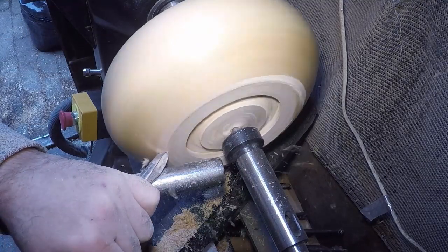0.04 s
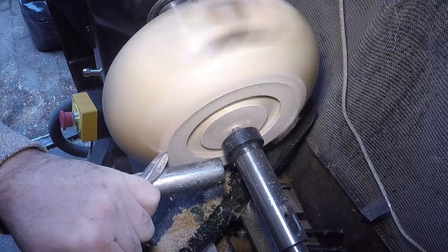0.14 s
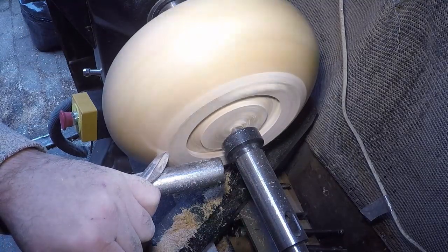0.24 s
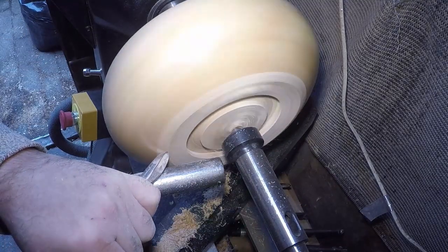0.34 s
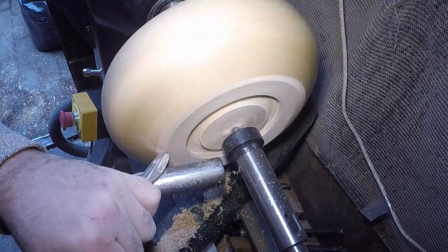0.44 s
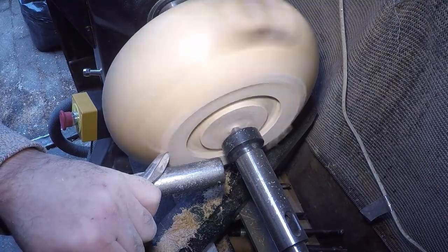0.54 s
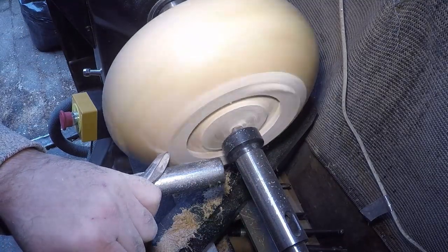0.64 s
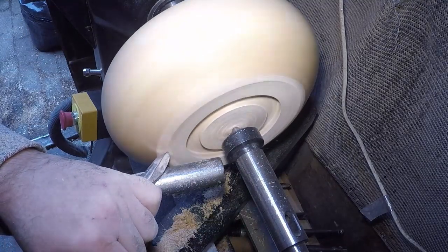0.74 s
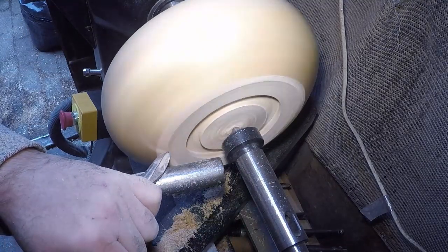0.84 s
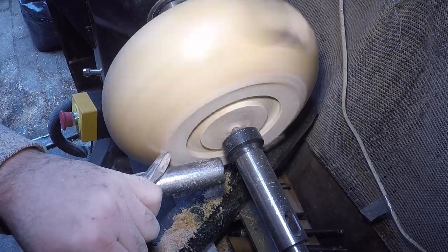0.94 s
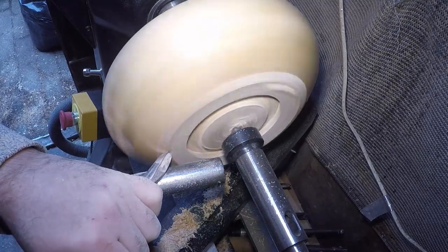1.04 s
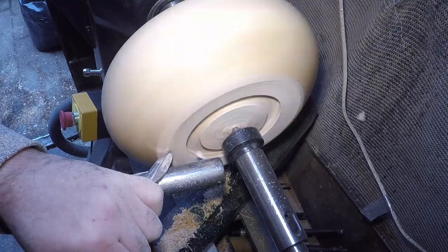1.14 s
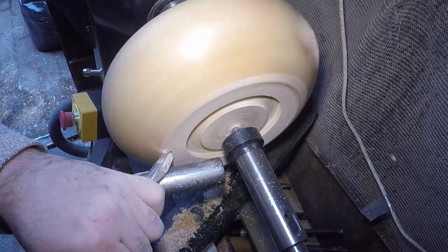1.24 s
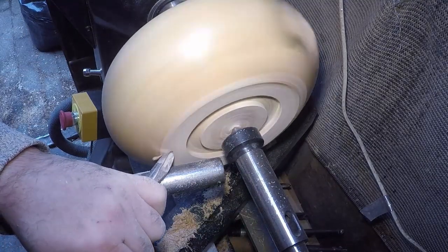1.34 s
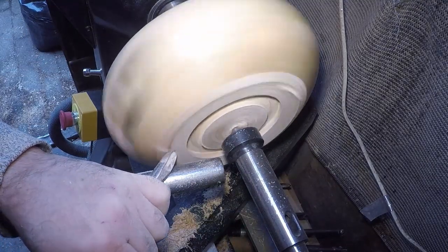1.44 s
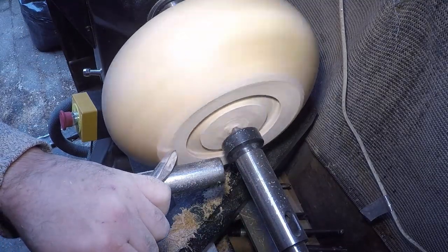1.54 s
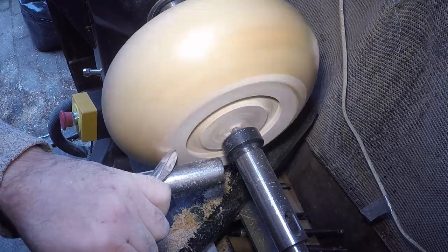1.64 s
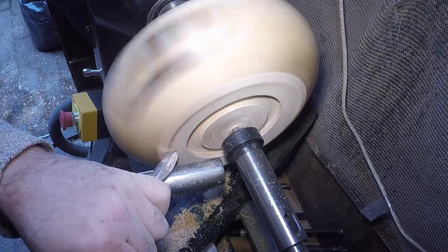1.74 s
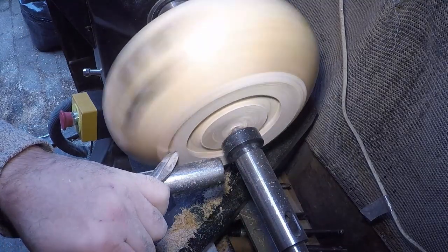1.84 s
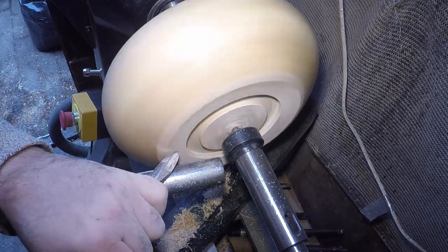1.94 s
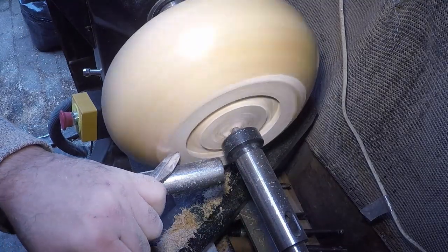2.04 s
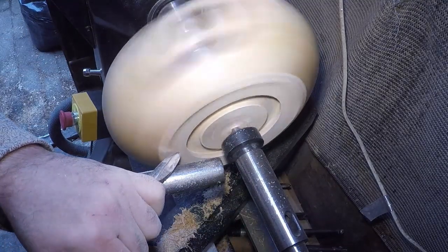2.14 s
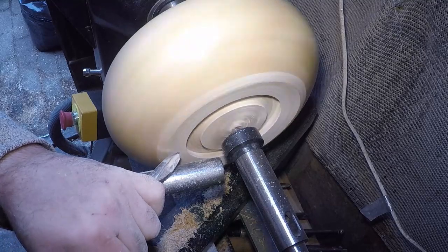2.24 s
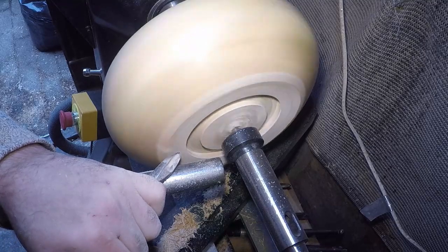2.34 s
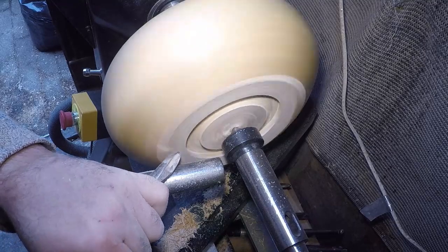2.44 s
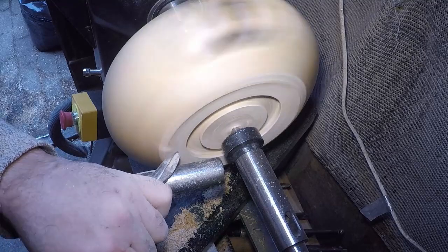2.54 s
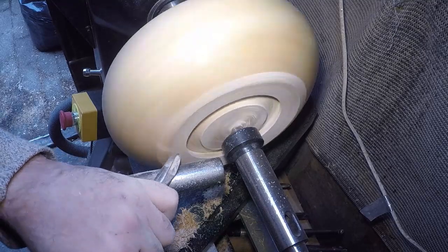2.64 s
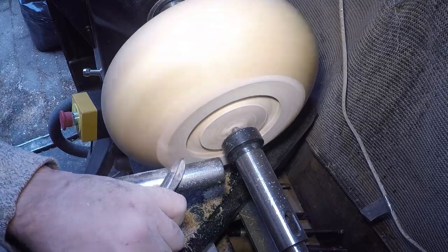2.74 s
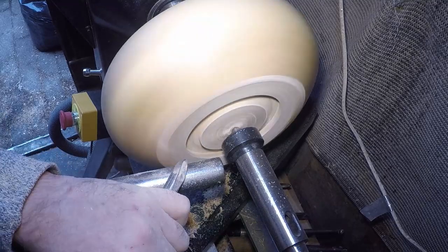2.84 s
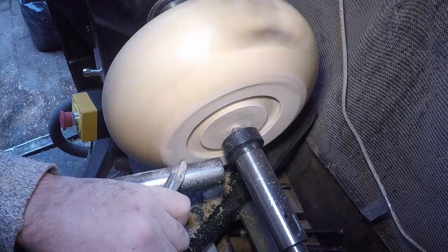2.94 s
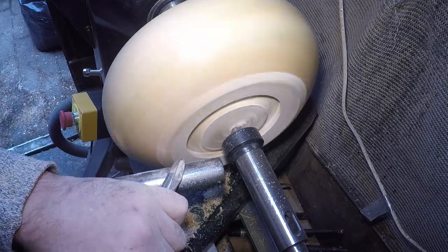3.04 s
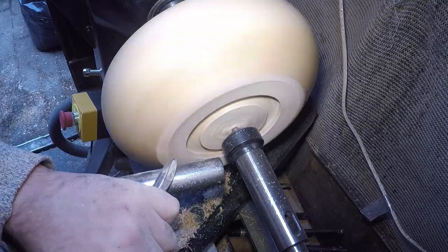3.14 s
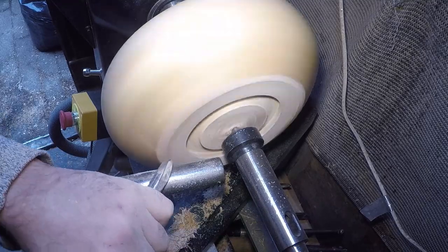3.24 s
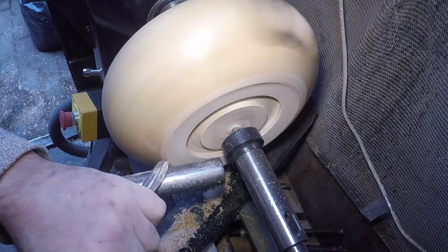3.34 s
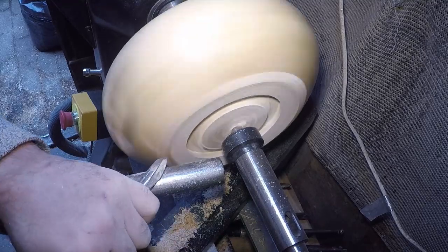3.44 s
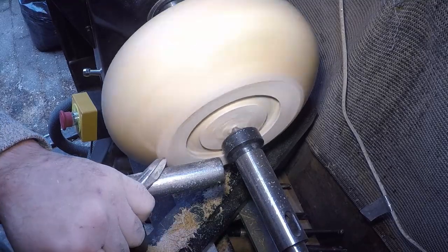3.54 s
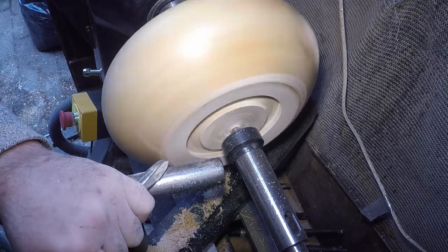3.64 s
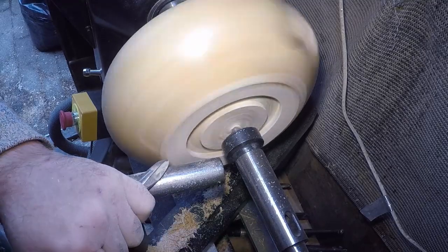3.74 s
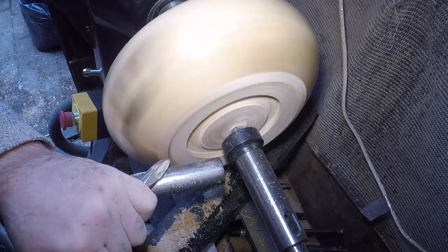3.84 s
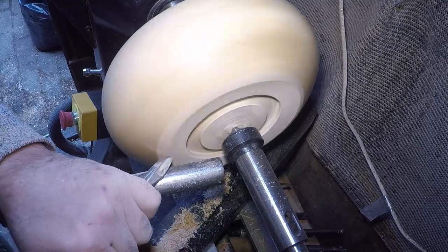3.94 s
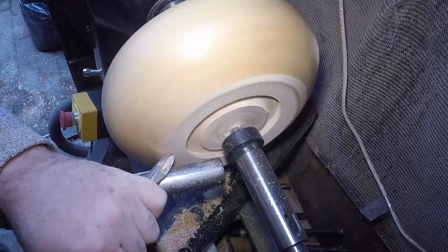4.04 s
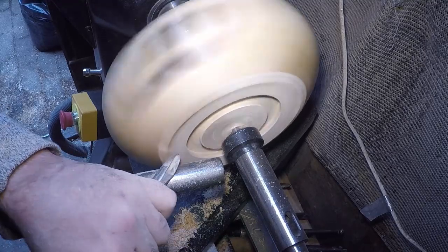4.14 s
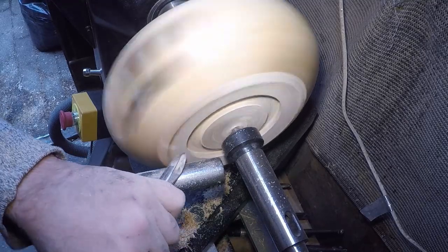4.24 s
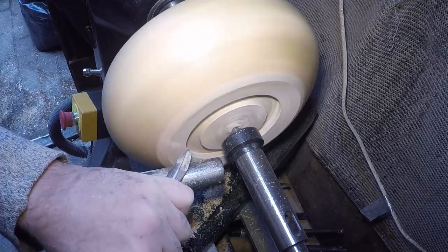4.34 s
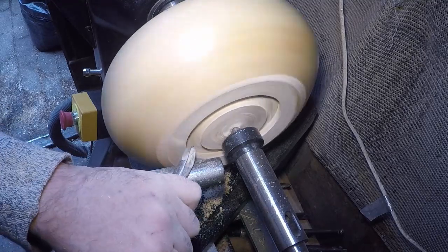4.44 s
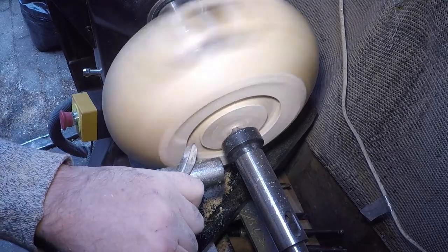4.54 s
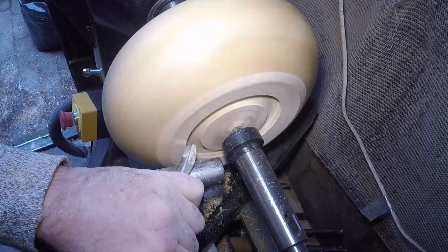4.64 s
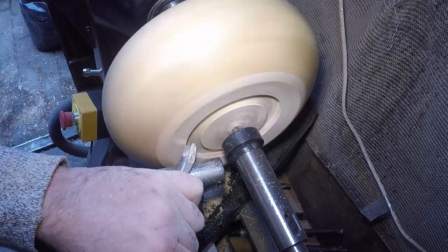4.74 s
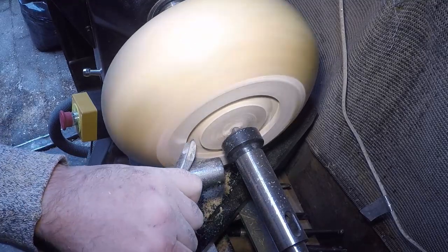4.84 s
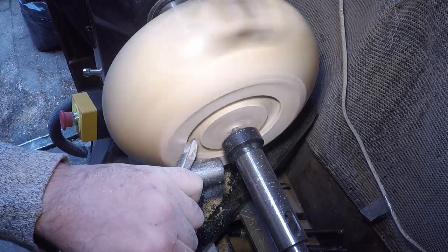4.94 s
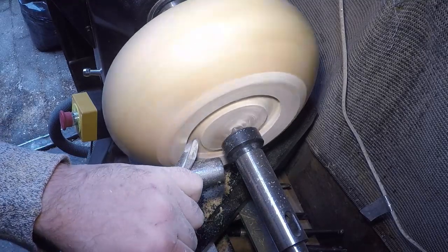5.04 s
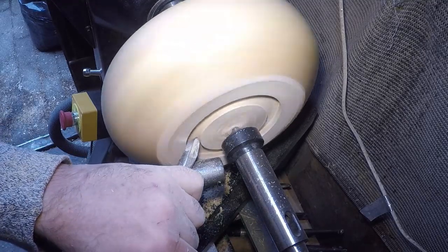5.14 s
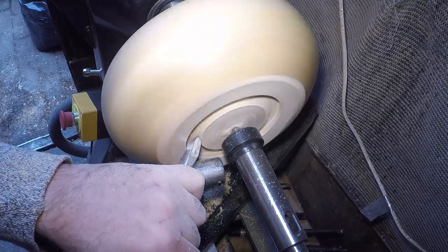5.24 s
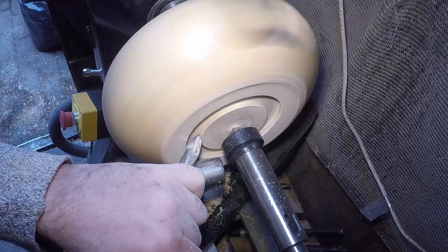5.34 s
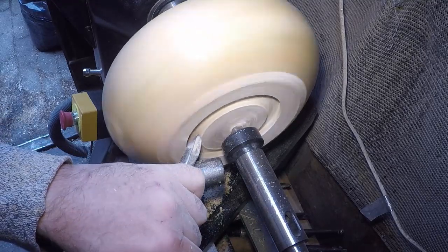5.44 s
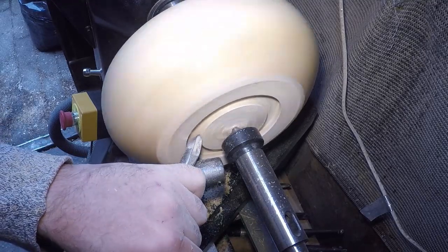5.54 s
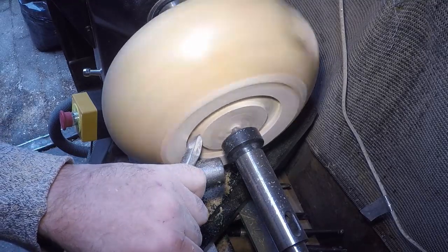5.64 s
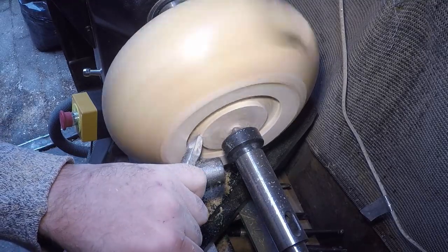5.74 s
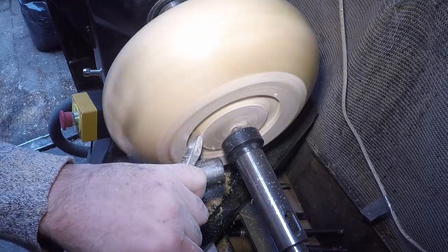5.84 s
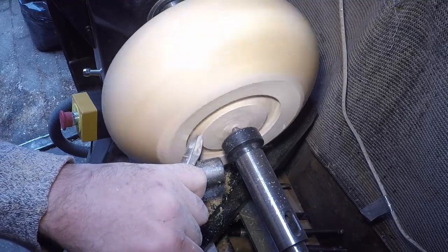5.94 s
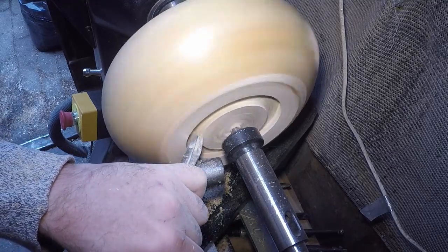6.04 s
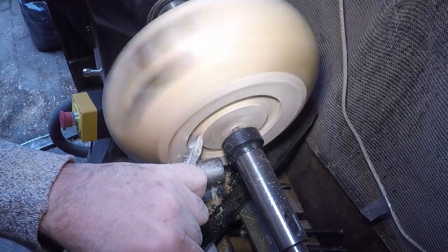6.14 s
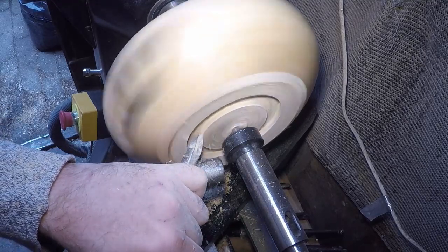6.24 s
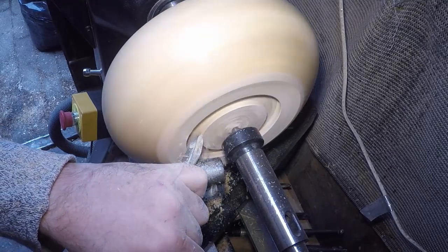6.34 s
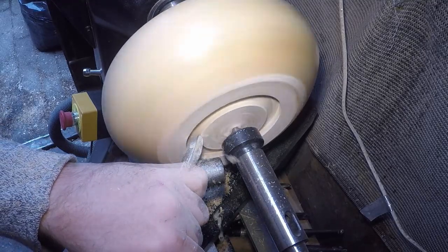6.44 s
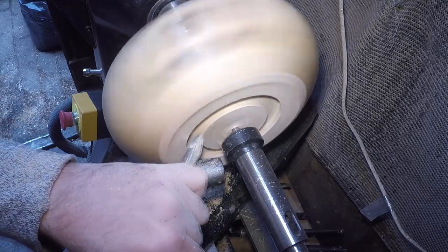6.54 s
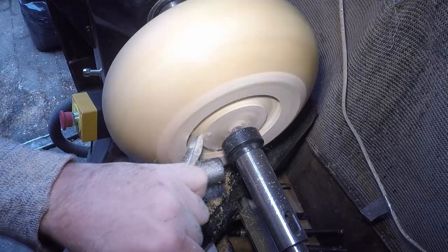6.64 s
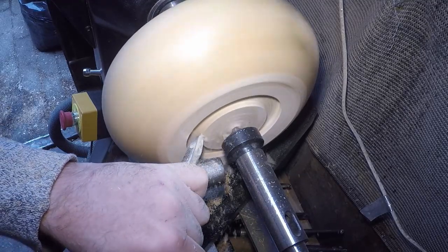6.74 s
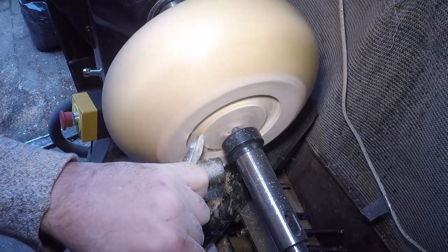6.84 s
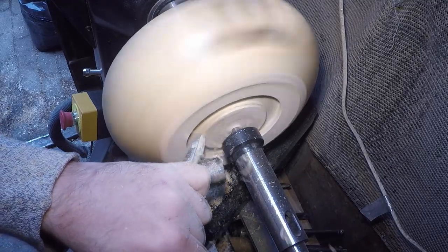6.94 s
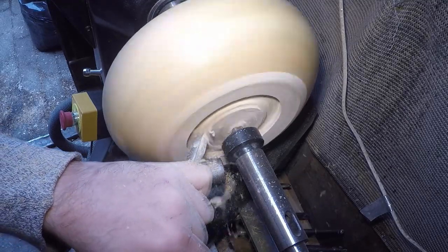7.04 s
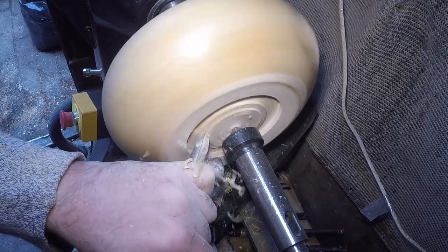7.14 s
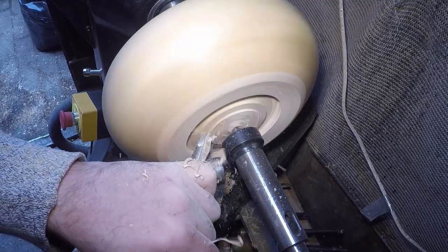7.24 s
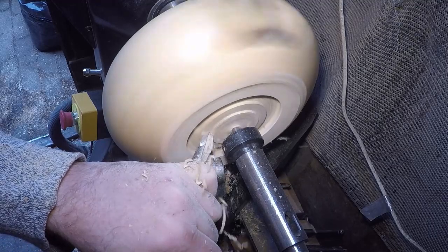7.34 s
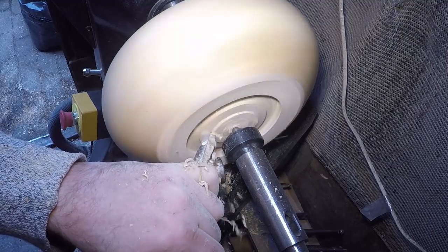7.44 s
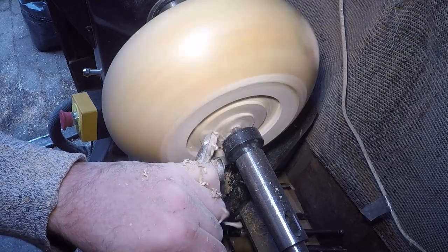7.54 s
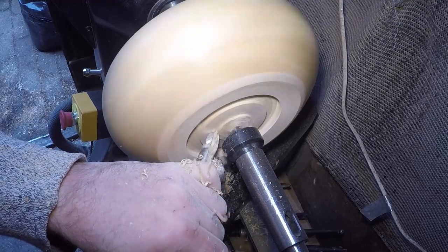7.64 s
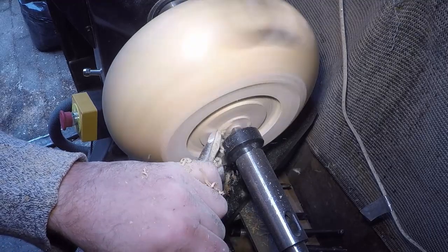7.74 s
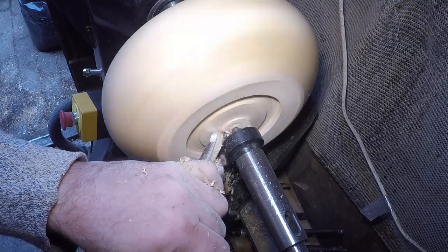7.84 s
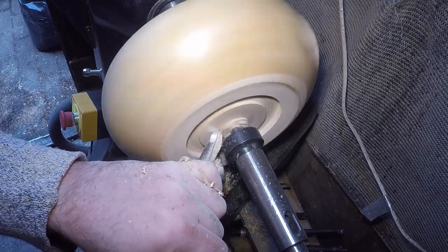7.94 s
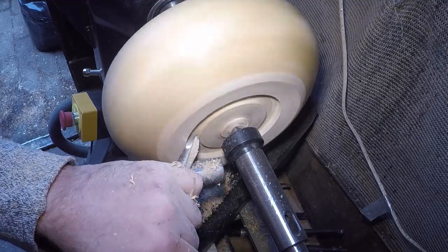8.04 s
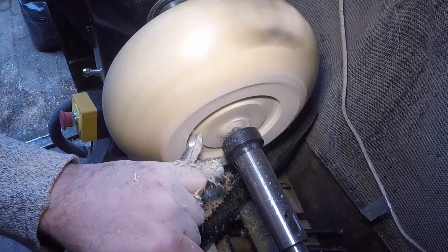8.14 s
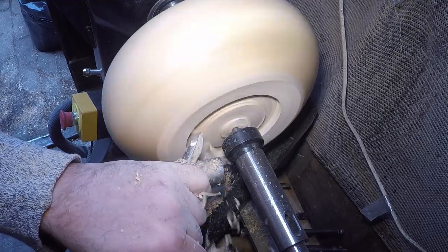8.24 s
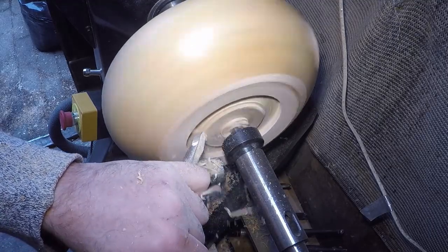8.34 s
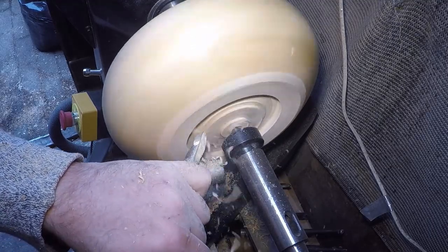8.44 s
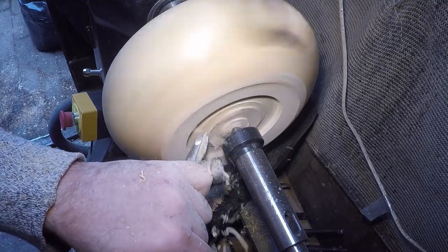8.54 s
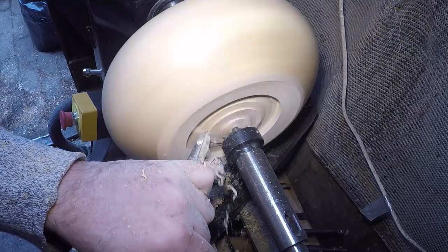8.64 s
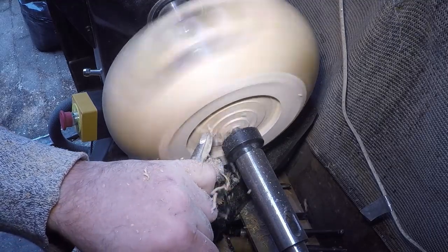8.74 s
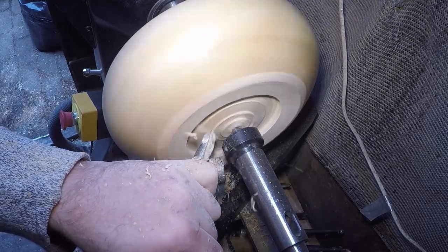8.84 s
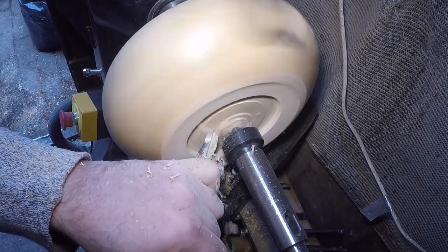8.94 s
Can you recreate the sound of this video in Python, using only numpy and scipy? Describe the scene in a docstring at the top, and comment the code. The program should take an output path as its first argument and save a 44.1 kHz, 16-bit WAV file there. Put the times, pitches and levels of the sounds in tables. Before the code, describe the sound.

Close up, a lathe hums as a gouge lightly scrapes a wooden bowl, lifts off with knocks, then digs in with a high squeal.

```python
"""A wooden bowl spins on a lathe in a workshop, a stereo microphone close by; a gouge cuts its foot.
First a light cut throbs as the same grain passes the edge every turn, ending at 1.4 s in touches and
knocks. Then the drive hums and hisses, with a dull bump and a few grazes. At 5.8 s a heavier cut starts,
its throb fading as the blank becomes round. Near 7 s the edge digs in and tears fresh wood: shavings
spit, the bowl drums and the tool squeals, in two strokes with a short break at 8 s."""
import sys
import numpy as np
from scipy import signal
from scipy.fft import rfft, irfft, next_fast_len
from scipy.io import wavfile
from scipy.ndimage import uniform_filter1d, map_coordinates

SR = 44100
rng = np.random.default_rng(int(sys.argv[2]) if len(sys.argv) > 2 else 0)


def dump(signal):
    """Clip the signal to [-1, 1] and save it as 16-bit WAV at the path in sys.argv[1]."""
    limited = np.clip(np.atleast_2d(signal).T, -1, 1)
    pcm = np.round(limited * 32767).astype(np.int16)
    wavfile.write(sys.argv[1], SR, pcm)


N = 396018
TURN = 3527  # samples in one turn of the spindle
TIME = np.arange(N) / SR

# The microphone's two ports. Each row: frequency in Hz, likeness from 0 to 1, left lead in radians,
# left over right in dB.
MIC_PORTS = [(60, .6, 0, -3), (170, .65, 0, -2), (345, .88, 0, 0), (520, .75, .2, 0), (860, .4, -.5, 0),
             (1200, .25, 0, 0), (1720, .9, 1.25, 1), (2240, .15, 1.5, 4), (2900, .75, -.6, -2),
             (3700, .92, 0, 0), (4500, .8, 0, 1), (5200, .62, .1, -1), (6200, .5, 0, 1.5),
             (7200, .25, 0, 0), (8600, .2, -2.6, -2.5), (10300, .2, -2.8, -1), (12000, .6, 0, 0)]

# Drive tones. Each row: level in dB, throb in dB, loudest point in seconds into the turn, left lead in
# radians, phase wander in radians.
DRIVE_TONES = [(-63, 1.5, 0.00041, 1, 0.13), (-53.5, -3, 0.023, -1.73, .1),
               (-51.5, 12.5, 0.043, 0.69, 0.18), (-56, 3.5, 0.079, 1, 0.17), (-57, 15, 0.1, 1, 0.21),
               (-52, 13, 0.075, 1, 0.32), (-58.5, 6, 0.007, 1, 4.2), (-53, 16, 0.06, 1, 0.92),
               (-67, 2, 0.09, 1, 1.6), (-61, 1, 0.057, 0, 2.8), (-58, 4, 0.076, 0, 4.9),
               (-63.5, -3, 0.11, 1, .5), (-58.5, 4.5, 0.087, 1, 0.44)]
TONE_ORDERS = [12, 23, 25, 36, 48, 72, 89.5, 114, 120, 331, 347, 143, 145]  # cycles a turn, one for each drive tone

# Levels over time. Each row: time in seconds, level in dB.
WHINE_LEVEL = [(0, -39.5), (1.2, -45), (1.6, -38), (2.3, -45.5), (3.3, -37), (3.9, -45.5), (4.5, -38.5),
               (6.3, -40.5), (7.1, -48), (8.98, -44)]  # strongest drive tone
LIGHT_LEVEL = [(0, -33), (.3, -32), (.6, -30.5), (1.3, -32), (1.35, -35), (1.4, -37), (1.44, -50),
               (1.46, -63)]
HEAVY_STROKES = [
    [(5.803, -25.5), (5.88, -34.5), (6.03, -27.5), (6.45, -24), (6.92, -26.5), (7.02, -27), (7.88, -27),
     (7.94, -36.5), (8, -39), (8.045, -39)],
    [(8.12, -39), (8.155, -28), (8.185, -23.5), (8.3, -26.5), (8.98, -26.5)],
]  # one list a stroke

# Noise colours. Each row: frequency in Hz, relative density in dB.
RUMBLE_COLOUR = [(110, -28), (150, -4), (250, -11), (310, -4), (390, -16), (470, -8), (540, -18.5),
                 (790, -18), (1020, -11), (1260, 1), (1600, -9.5), (3580, -17), (4230, -14.5), (5200, -35),
                 (6760, -58)]
BEARING_COLOUR = [(2940, -66), (5000, -13.5), (5220, -14.5), (6170, -0.5), (7170, -2), (8410, -11),
                  (10600, -29.5), (12800, -38), (15300, -35)]
TOUCH_COLOUR = [(500, -41), (850, -24), (1700, -2), (2300, -2.5), (3500, -1), (5500, -8.5), (7150, -17),
                (12100, -120)]
LIGHT_COLOUR = [(410, -35), (700, -20), (1010, -22), (1270, -23), (1760, -6.5), (1940, -11), (2930, -8),
                (5500, -17.5), (7150, -15.5), (12100, -120)]
HEAVY_COLOUR = [(470, -54), (800, -15), (896, -14), (1590, -6.5), (1790, 6), (2040, -3.5), (2840, 1),
                (5500, -8.5), (7150, -33), (12100, -120)]
SHAVINGS_COLOUR = [(2710, -25), (4600, -8), (4690, -11), (6540, 0.5), (7050, -5), (7800, -4.5), (8500, -11),
                   (10700, -21), (14000, -28.5), (15300, -35)]
SPIT_COLOUR = [(1500, -36), (3000, -14), (5000, -2.5), (7500, 4.5), (10000, -5.5), (13000, -24.5),
               (15300, -26)]

# Resonances. Each row: frequency in Hz, width in Hz, relative gain in dB.
BEARING_MODES = [(5840, 73, 0.5), (6370, 30, 8.5), (7140, 110, 4), (7390, 82, 3)]
CUT_MODES = [(1072, 17, 11.5), (1515, 250, 6.5), (1732, 450, -2), (1984, 94, 4), (2153, 21, 10),
             (2450, 93, 3), (2817, 360, 1.5), (3245, 117, 4.5), (3490, 97, 0), (3914, 310, 7.5),
             (4364, 33, 1.5), (5160, 630, 4)]  # tool, rest and bowl
LIGHT_BED_MODES = [(164.5, 24, -3.5), (327, 52, -4), (420, 60, -1.5)]  # lathe bed and bowl under a light cut
HEAVY_BED_MODES = [(164, 6.2, -5), (337.5, 33, 0.5), (440, 73, -4), (910, 39, -0.5)]  # the same, cut nearer the centre
BOWL_MODES = [(338, 36, 14)]
TEAR_MODES = [(80, 42, 7), (157, 110, 2), (443, 107, 9), (874, 240, 7), (1340, 490, -7)]  # thick chips breaking off

# Hardness of the grain around the blank. Each row: seconds into the turn, hardness in dB.
LIGHT_GRAIN = [(.003, 4), (.011, 8.5), (.018, 15), (.029, 14), (.04, 6), (.047, 3), (.054, 12), (.063, 15),
               (.074, 14)]
HEAVY_GRAIN = [(.006, 4), (.014, -6.5), (.026, -3), (.033, 6.5), (.042, -1.5), (.05, -1), (.058, 6),
               (.07, 11), (.078, 11)]
# Hard fibres that ring as they pass. Each row: seconds into the turn, pitch in Hz, relative level in dB,
# length in seconds, growth in dB a second.
LIGHT_FIBRES = [(.0155, 1750, 8, .005, 7), (.019, 2975, 9, .004, 0), (.0245, 3590, 9, .005, 1),
                (.022, 2390, 2, .005, 12), (.028, 1810, 3, .004, 4), (.07, 1740, 5, .013, 3),
                (.067, 5300, 3, .004, 0), (.056, 3000, 2, .005, -4), (.071, 3550, 3, .005, -2),
                (.037, 2320, -7, .007, 17), (.031, 3300, 3, .004, -4)]
HEAVY_FIBRES = [(.056, 4220, 5, .008, -5), (.068, 1770, 5, .007, 12), (.076, 2950, 2, .005, 10),
                (.005, 1800, 2, .005, -14), (.037, 1800, -1, .005, 10), (.032, 3050, -1, .0035, 14)]
# Surface that survives one turn. Each row: time in seconds, share from 0 to 1.
SURFACE_KEPT = [(0, .65), (.35, .92), (.9, .97), (1.1, .85), (1.3, .3), (5.8, .5), (6.4, .68), (6.8, .55),
                (7.05, .05), (8.98, .05)]

# Short events. Each row: start in seconds, strength in dB.
KNOCKS = [(1.378, -33), (1.506, -19.5), (1.585, -30), (1.643, -27), (5.831, -22)]
SPITS = [(7.0166, -18), (7.036, -16), (7.064, -22), (7.3782, -19.5), (7.484, -18.5), (8.283, -12),
         (8.311, -15), (8.364, -19), (8.4099, -22), (8.431, -20), (8.6406, -19), (8.6718, -16)]
SQUEAL_SURGES = [(6.9935, -16), (7.016, -14), (7.1182, -14), (7.1536, -13), (7.3961, -15), (7.453, -13),
                 (7.5517, -15), (7.7186, -13), (7.7488, -14), (8.2781, -15), (8.3882, -14), (8.4302, -17),
                 (8.5145, -12), (8.6911, -13), (8.748, -14), (8.7869, -14), (8.8698, -15), (8.9186, -13),
                 (8.9446, -17)]
# The knocked bowl. Each row: pitch in Hz, relative level in dB, seconds to fall by 60 dB.
KNOCK_MODES = [(339, -3.5, .1), (446, -5, 0.052), (597, -3, 0.037), (930, -1, 0.03)]
# Grazes of the edge. Each row: start in seconds, strength in dB, length in seconds.
TOUCHES = [(1.378, -16, 0.0066), (1.408, -19, 0.025), (1.465, -17.5, 0.014), (1.487, -17.5, 0.011),
           (1.506, -22.5, 0.0086), (1.557, -15.5, 0.0082), (1.565, -19, 0.013), (1.584, -20.5, 0.011),
           (1.6392, -20.5, 0.0077), (1.6463, -22, 0.011), (1.7216, -30.5, 0.014), (4.912, -28.5, 0.017),
           (4.978, -23, 0.014), (4.988, -30, 0.019), (8.032, -26.5, 0.0088), (8.1, -19.5, 0.021)]
# Swells of the drumming bowl. Each row: centre in seconds, strength in dB, half-width in seconds.
DRUM_SWELLS = [(7, -33, 0.023), (7.132, -34, 0.076), (7.322, -23.5, 0.062), (7.445, -22.5, 0.039),
               (7.55, -23, 0.064), (7.696, -22.5, 0.055), (7.823, -20.5, 0.048), (7.89, -29, 0.053),
               (8.371, -38, 0.14), (8.64, -34, 0.1), (8.795, -25.5, 0.074), (8.96, -25, 0.079)]
# The tool's squeal, one list a stroke. Each row: time in seconds, level in dB, pitch in Hz.
SQUEAL_STROKES = [
    [(6.75, -47, 3990), (6.94, -26, 3910), (7.2, -23.5, 3937), (7.45, -22, 4050), (7.62, -22.5, 4040),
     (7.76, -19, 4000), (7.83, -24.5, 3870), (7.87, -18, 4220), (7.915, -28, 4280)],
    [(8.16, -39, 3980), (8.19, -25, 3894), (8.235, -33, 3700), (8.28, -24, 3810), (8.37, -22, 3900),
     (8.58, -19, 3930), (8.615, -32, 3400), (8.645, -21, 3836), (8.81, -19.5, 3894), (8.98, -22, 4060)],
]
# Clear whistle within the squeal. Each row: time in seconds, relative amplitude.
WHISTLE_SIZE = [(7.9, .55), (8.2, .8)]


def amp(db):
    """Gain of a level in dB."""
    return 10 ** (np.asarray(db) / 20)


def unit(x):
    """x at rms 1."""
    return x / np.sqrt(np.mean(x ** 2) + 1e-20)


def along(points, hz, column=1):
    """One column of a frequency table, read on a log axis."""
    columns = np.transpose(points)
    return np.interp(np.log(hz + 1), np.log(columns[0] + 1), columns[column])


def curves(*tables):
    """A curve for each column after the time, then a gate: 1 while a table lasts, 0 outside."""
    times, *columns = np.transpose(np.concatenate(tables))
    on = sum((TIME >= rows[0][0]) & (TIME <= rows[-1][0]) for rows in tables)
    gate = uniform_filter1d(np.clip(on, 0, 1.), size=300, mode="nearest")
    return [np.interp(TIME, times, column) for column in columns] + [gate]


def wobble(rate):
    """A smooth random curve, rate knots a second."""
    return map_coordinates(rng.standard_normal(int(N * rate / SR) + 4), [TIME * rate])


def bursts(rows, sharpness=4):
    """Envelope of bursts that rise fast and fall slower. Each row: start, strength in dB, length."""
    envelope, t = np.zeros(N + SR), np.arange(SR // 10) / SR
    for start, db, length in rows:
        rise = 1 - np.exp(-sharpness * t / length)
        envelope[round(start * SR):][:len(t)] += amp(db) * rise * np.exp(-(t / length) ** 2)
    return envelope[:N]


def filtered(x, response):
    """x through a complex frequency response."""
    size = next_fast_len(N + 8192)
    return irfft(rfft(x, size) * response(np.fft.rfftfreq(size, 1 / SR)), size)[..., :N]


def ring(modes, hz):
    """Summed response of resonances."""
    return sum(amp(db) * 1j * hz * width / (centre ** 2 - hz ** 2 + 1j * hz * width)
               for centre, width, db in modes)


def turned(fresh, keep):
    """Rows of turns; each repeats a share of the turn before."""
    rows = fresh.copy()
    for k in range(1, len(rows)):
        rows[k] = keep[k] * rows[k - 1] + np.sqrt(1 - keep[k] ** 2) * fresh[k]
    return rows


def surface(kept, lumpy_db):
    """Two rough, lumpy noises; the share kept comes round again with the next turn."""
    turns = N // TURN + 1
    keep = np.clip(np.broadcast_to(kept, N)[::TURN], 0, .98)
    lumps = uniform_filter1d(rng.standard_normal((turns, 1, TURN)), size=70, axis=2, mode="wrap")
    rough = turned(rng.standard_normal((turns, 2, TURN)), keep)
    rough *= amp(lumpy_db * turned(unit(lumps), keep))
    return unit(rough.transpose(1, 0, 2).reshape(2, -1)[:, :N])


def at_mic(pair, colour):
    """Two noises, coloured and mixed as the microphone's ports receive them; their mean has rms 1."""
    def spread(hz):
        angle = np.arccos(np.clip(along(MIC_PORTS, hz), 0, 1)) / 2
        return colour(hz) * np.array([np.cos(angle), np.sin(angle)])

    def balance(hz):
        left = amp(along(MIC_PORTS, hz, column=3) / 2) * np.exp(.5j * along(MIC_PORTS, hz, column=2))
        return np.array([left, 1 / left])

    mid, side = filtered(pair, spread)
    both = filtered(np.array([mid + side, mid - side]), balance)
    return both / np.sqrt(np.mean(both.mean(0) ** 2))


def workshop(x, decay_s=.17):
    """A short answer from the walls, different at each port."""
    t = np.arange(SR // 4) / SR
    tail = rng.standard_normal((2, len(t))) * amp(-60 * t / decay_s) * (t > .003)
    return signal.fftconvolve(x, tail / np.linalg.norm(tail[0]), axes=1)[:, :N]


def drive_tone(order, db, throb_db, loudest_s, lead, wander):
    """A tone tied to the spindle that swells once a turn and wanders in phase."""
    angle = 2 * np.pi * np.arange(N) / TURN
    swell = 1 + np.tanh(throb_db * np.log(10) / 20) * np.cos(angle - 2 * np.pi * loudest_s * SR / TURN)
    phase = order * angle + wander * wobble(6) + rng.uniform(0, 2 * np.pi)
    return amp(db) * unit(swell * np.sin(phase + np.array([[lead / 2], [-lead / 2]])))


def drive():
    """Motor, belt and bearings: tones, a partly repeating rumble, hiss, a faint rub, one dull bump."""
    tones = sum(drive_tone(order, *row) for order, row in zip(TONE_ORDERS, DRIVE_TONES))
    whine_db = curves(WHINE_LEVEL)[0] + 1.2 * wobble(9)
    tones += drive_tone(order=97, db=whine_db, throb_db=13, loudest_s=.0062, lead=1.74, wander=1.53)
    swell = amp(2.5 * np.cos(2 * np.pi * (np.arange(N) - 2900) / TURN))
    rumble = at_mic(surface(.48, lumpy_db=1), lambda hz: amp(along(RUMBLE_COLOUR, hz)))
    rumble += (swell - 1) * filtered(rumble, lambda hz: .5 + .5 / (1 + (hz / 2000) ** 4))
    hiss = at_mic(surface(0, lumpy_db=0),
                  lambda hz: amp(along(BEARING_COLOUR, hz)) * abs(1 + ring(BEARING_MODES, hz)))
    once_a_turn = (.5 + .5 * np.cos(2 * np.pi * (TIME - .075) * SR / TURN)) ** 2
    rub_gain = amp(-54 + 2.5 * wobble(5)) * once_a_turn
    rub = rub_gain * at_mic(surface(.81, lumpy_db=2), lambda hz: ring([(3000, 150, 0)], hz))
    t = np.clip(TIME - 2.525, 0, None)  # seconds since the bump
    bump = amp(-33 - 60 * t / .11) * (1 - np.exp(-t / .0032)) * np.sin(2 * np.pi * 150 * t)
    hiss_db = -40 + .76 * wobble(3.93) + .15 * wobble(23)
    return tones + amp(-42.5) * rumble + amp(hiss_db) * hiss + rub + bump


def knocks():
    """The bowl knocks on the edge: hollow, woody blows."""
    out, t = np.zeros(N), np.arange(SR // 5) / SR
    for start, db in KNOCKS:
        blow = sum(amp(db + mode_db + rng.normal(0, 2) - 60 * t / decay_s) * np.sin(2 * np.pi * hz * t)
                   for hz, mode_db, decay_s in KNOCK_MODES)
        out[round(start * SR):][:len(t)] += (1 - np.exp(-t / .0043)) * blow
    return out


def grain(profile):
    """Hardness in dB under the edge at every sample."""
    seconds, db = np.transpose(profile)
    return np.interp(np.arange(N) % TURN / SR, seconds, db, period=TURN / SR)


def bite(at_s=6.95, takes_s=.11):
    """Depth of the heavy pass, from 0 skimming to 1 dug in."""
    return .5 + .5 * np.tanh((TIME - at_s) / takes_s)


def bed_shake(modes, hard_db):
    """The cutting force drives low resonances of bed and bowl, nearly the same every turn."""
    force = amp(hard_db) * surface(.904, lumpy_db=1)
    return at_mic(force, lambda hz: ring(modes, hz) * abs(ring(modes, hz)))


def fibres(rows, reference_s, vary_db, pitch_fall=.03):
    """Hard fibres ring briefly at each pass, falling in pitch and changing from turn to turn."""
    turn_s, out = TURN / SR, 0
    for at_s, hz, db, length, growth in rows:
        since = (TIME - at_s + turn_s / 2) % turn_s - turn_s / 2
        cycles = hz * since * (1 - pitch_fall * since / length / 2)
        level_db = db + growth * np.clip(TIME - reference_s, -1, 1) + vary_db * wobble(5.6)
        lead = np.array([[.5], [-.5]]) * along(MIC_PORTS, hz, column=2)
        phase = 2 * np.pi * cycles + 1.2 * wobble(2.56) + lead
        out = out + amp(level_db) * np.exp(-(since / length) ** 2) * np.sin(phase)
    return out


def scrape(force, hiss_gain, colour, dull_hz, lumpy_db):
    """The fibres excite tool and bowl, which ring on; the shavings hiss and repeat less."""
    kept = curves(SURFACE_KEPT)[0]
    wood = at_mic(surface(kept, lumpy_db), lambda hz: amp(along(colour, hz)))
    rung = filtered(force * wood, lambda hz: .35 + ring(CUT_MODES, hz) / 2)
    shavings = at_mic(surface(kept ** 4, lumpy_db),
                      lambda hz: amp(along(SHAVINGS_COLOUR, hz)) / np.sqrt(1 + (hz / dull_hz) ** 4))
    return rung + hiss_gain * shavings


def touches(clear_s=1.53):
    """The edge catches and lets go, jolting bed and bowl; duller until it is clear of the first cut."""
    force = bursts(TOUCHES, sharpness=5)
    hiss_rows = [(start, db - 1.5 - 6 * (start < clear_s), length) for start, db, length in TOUCHES]
    jolt = filtered(force * rng.standard_normal(N), lambda hz: ring(HEAVY_BED_MODES, hz))
    graze = scrape(force, bursts(hiss_rows, sharpness=5), TOUCH_COLOUR, dull_hz=11900, lumpy_db=0)
    return graze + amp(2) * jolt


def light_pass():
    """End grain meets the edge twice a turn; the bed shakes with it."""
    level_db, on = curves(LIGHT_LEVEL)
    hard_db = grain(LIGHT_GRAIN)
    hard_db += .99 * np.exp(-TIME / .14) * (hard_db.mean() - hard_db)  # starts even, then throbs
    hard_db += .34 * np.clip(TIME - .9, 0, 1) * (hard_db - hard_db.max())  # the throb deepens late on
    gain = on * amp(level_db)
    hiss_gain = gain * amp(2.5 - 8 * TIME + .7 * hard_db)  # the shavings fade as the pass goes on
    cut = scrape(gain * amp(hard_db), hiss_gain, LIGHT_COLOUR, dull_hz=6500, lumpy_db=1.8)
    rings = amp(8.5) * fibres(LIGHT_FIBRES, reference_s=.64, vary_db=1.2)
    bed = amp(-5) * bed_shake(LIGHT_BED_MODES, .87 * hard_db)
    return cut + gain * (rings + bed)


def heavy_pass(rounding_s=.67):
    """At first only the high side of the blank touches; the throb fades as the cut becomes round."""
    level_db, on = curves(*HEAVY_STROKES)
    gain, depth, grain_db = on * amp(level_db), bite(), grain(HEAVY_GRAIN)
    since = np.clip(TIME - HEAVY_STROKES[0][0][0], 0, None)
    throb = .092 + .62 * np.exp(-(since / rounding_s) ** 2.1)
    low_side = .5 - .5 * np.tanh(5 * np.cos(2 * np.pi * (np.arange(N) / TURN - .91)) + 1)
    missed_db = 40 * np.clip(throb - .45, 0, None) * low_side
    hard_db = throb * grain_db - missed_db + wobble(30)
    hiss_gain = gain * amp(-2 + .5 * depth + 1.26 * hard_db)
    cut = scrape(gain * amp(hard_db), hiss_gain, HEAVY_COLOUR, dull_hz=15800, lumpy_db=2.5)
    ring_gain = np.sqrt(throb) * (1 - depth) * amp(2.5 - missed_db)
    rings = ring_gain * fibres(HEAVY_FIBRES, reference_s=6.1, vary_db=2)
    bed = amp(-14.5 - 23 * depth) * bed_shake(HEAVY_BED_MODES, .71 * grain_db)
    return cut + gain * (rings + bed)


def spits(length_s=.0085):
    """Shavings spit off the edge in the deep cut: bright bursts over a restless fizz."""
    level_db, on = curves(*HEAVY_STROKES)
    fizz = on * bite() * amp(level_db - 12 + 5 * wobble(45))
    crackle = bursts([(start, db - 2.5, length_s) for start, db in SPITS])
    return (crackle + fizz) * at_mic(surface(0, lumpy_db=-3.5), lambda hz: amp(along(SPIT_COLOUR, hz)))


def bowl_drum(drone_hz=335):
    """Thick chips tear off in the deep cut and drum the bowl in swells."""
    swells = sum(amp(db) * np.exp(-((TIME - centre) / width) ** 2) for centre, db, width in DRUM_SWELLS)
    bowl = at_mic(surface(.066, lumpy_db=-1), lambda hz: ring(BOWL_MODES, hz))
    drone = np.sqrt(2) * np.sin(2 * np.pi * drone_hz * TIME + .93 * wobble(17))
    drum = swells * (.55 * bowl + amp(-3.5 + 1.8 * wobble(25)) * drone)
    tear = at_mic(surface(0, lumpy_db=8), lambda hz: ring(TEAR_MODES, hz))
    tear_gain = amp(curves(*HEAVY_STROKES)[0] - 10) + amp(-24.5) * swells
    on = curves(*SQUEAL_STROKES)[-1]
    return drum + on * bite() * tear_gain * tear


def tool_squeal(surge_s=.0052):
    """The tool chatters around a sliding pitch, surging as a clear whistle; a higher mode joins in."""
    level_db, pitch_hz, on = curves(*SQUEAL_STROKES)
    chatter = filtered(surface(0, lumpy_db=0),
                       lambda hz: 1 / (1 + (hz / 105) ** 2) + .42 / (1 + (hz / 300) ** 4))
    phase = 2 * np.pi * np.cumsum(pitch_hz + 35 * wobble(60)) / SR
    evening = np.sqrt(np.hypot(*chatter) + 1e-9)  # dividing by this evens out the rasp
    rasp = unit((chatter[0] * np.cos(phase) + chatter[1] * np.sin(phase)) / evening)
    whistle = curves(WHISTLE_SIZE)[0] * np.cos(phase)
    main_mode = (.65 * rasp + whistle) * amp(2.5 * wobble(90))
    upper_db = 3.1 * wobble(12) - 2.7 * (TIME > HEAVY_STROKES[1][0][0])  # weaker in the second stroke
    upper_mode = .55 * amp(upper_db) * unit(chatter[1]) * np.cos(1.075 * phase)
    surges = bursts([(start, db - 2, surge_s) for start, db in SQUEAL_SURGES]) * np.cos(phase)
    squeal = amp(level_db) * (main_mode + upper_mode) + surges
    side = .21 * amp(level_db) * unit(chatter[1] * np.cos(phase))
    return on * (squeal * amp([[.8], [-.8]]) + np.array([side, -side]))  # a little left of centre


def scene():
    """The gouge close up, the walls faint behind it, over the running drive."""
    cut = light_pass() + heavy_pass() + bowl_drum() + tool_squeal() + spits() + touches() + knocks()
    return cut + amp(-11) * workshop(cut) + drive()


def record(dry, smoothing_s=.12, threshold_db=-32, bass_cut_hz=120, top_hz=15400):
    """Behind the microphone: gain control eases loud passages; bass cut, circuit rumble, band limit."""
    hold = np.exp(-1 / (smoothing_s * SR))
    opening_power = np.mean(dry[:, :SR // 10] ** 2)
    power = signal.lfilter([1 - hold], [1, -hold], np.mean(dry ** 2, 0), zi=[opening_power * hold])[0]
    over_db = np.clip(10 * np.log10(power + 1e-12) - threshold_db, 0, None)
    bass_cut = signal.butter(6, bass_cut_hz, "high", fs=SR, output="sos")
    eased = signal.sosfilt(bass_cut, dry * amp(-.15 * over_db))
    circuit = amp(-79) * at_mic(rng.standard_normal((2, N)), lambda hz: 1 / (1 + (hz / 110) ** 6))
    return filtered(eased + circuit, lambda hz: hz < top_hz)


dry = scene()
out = record(dry)
dump(out)
```